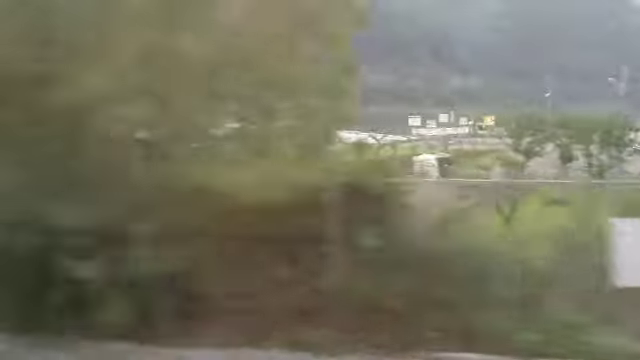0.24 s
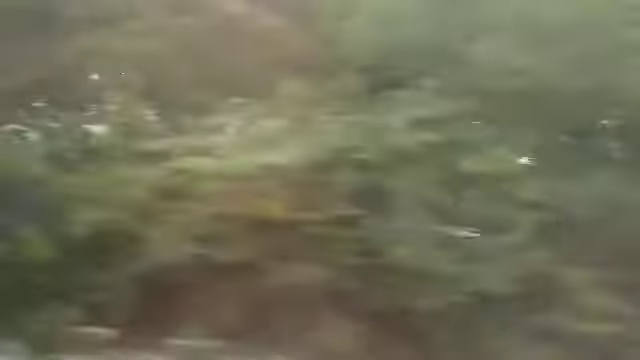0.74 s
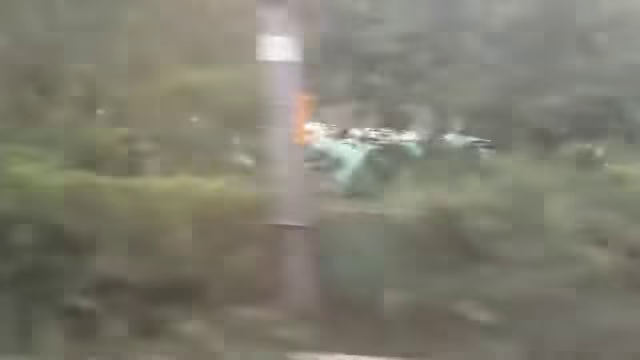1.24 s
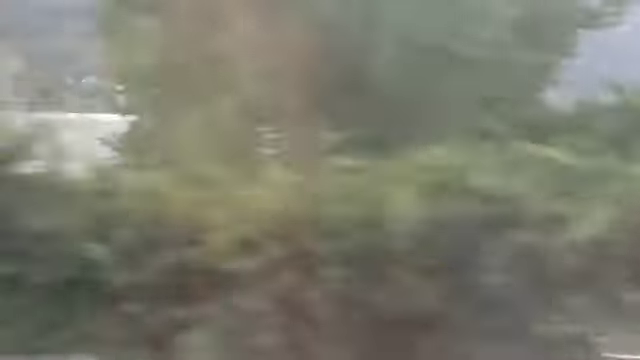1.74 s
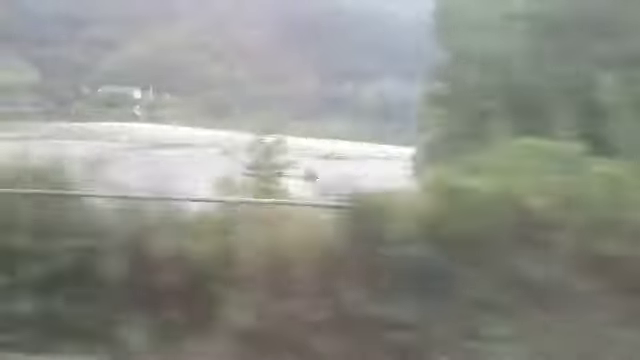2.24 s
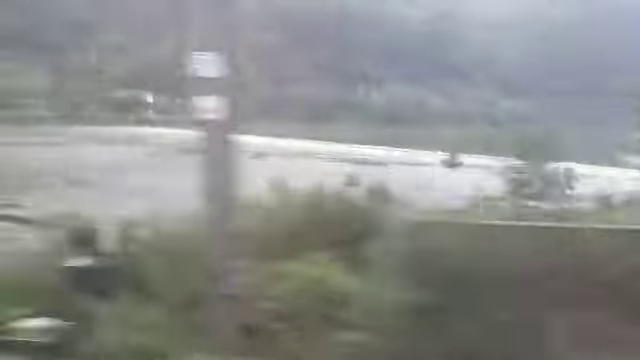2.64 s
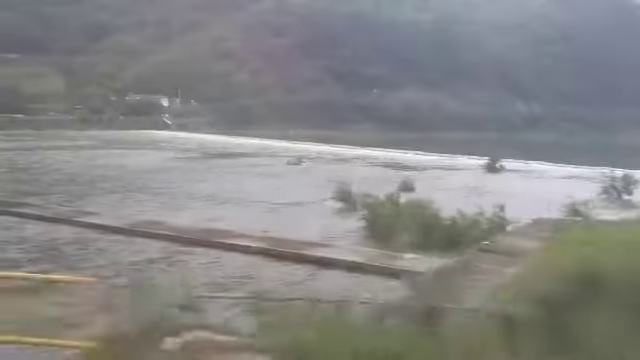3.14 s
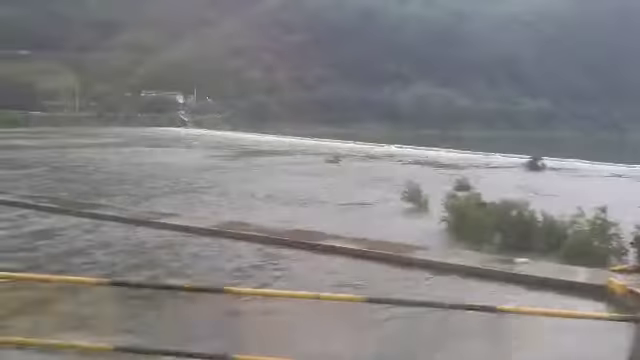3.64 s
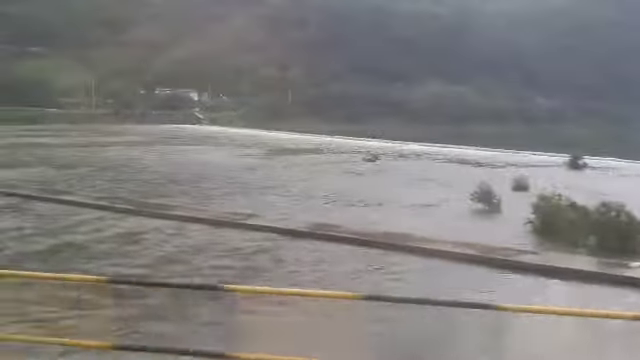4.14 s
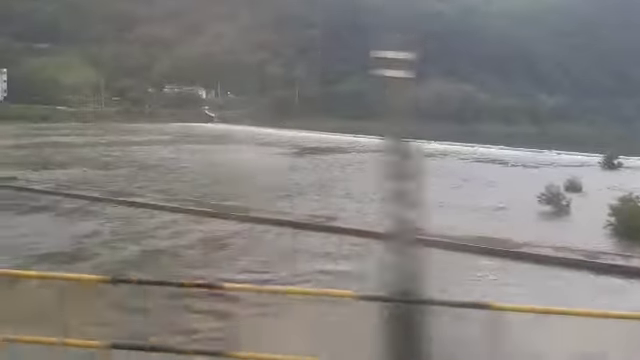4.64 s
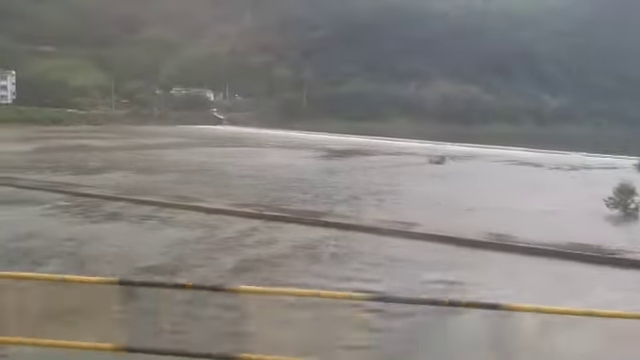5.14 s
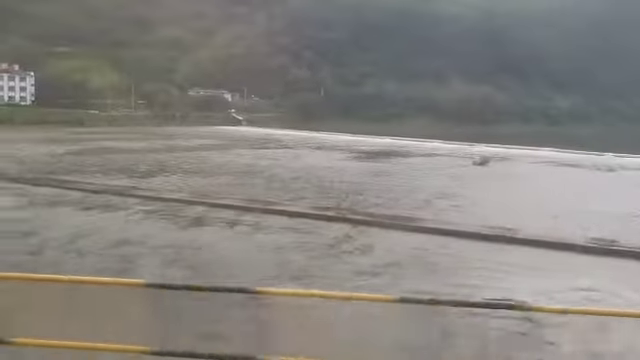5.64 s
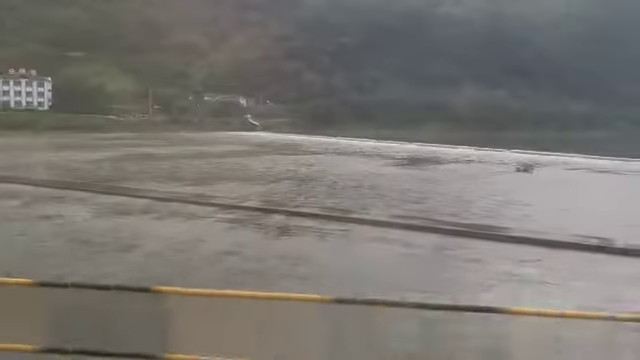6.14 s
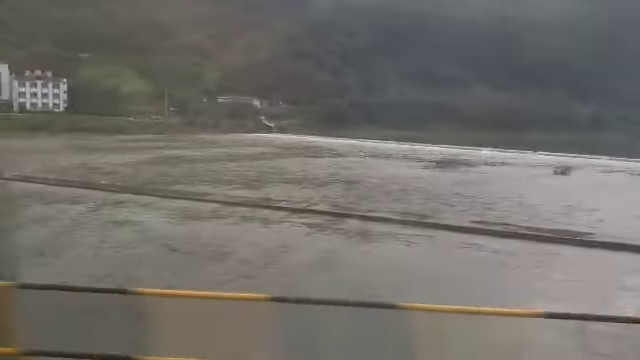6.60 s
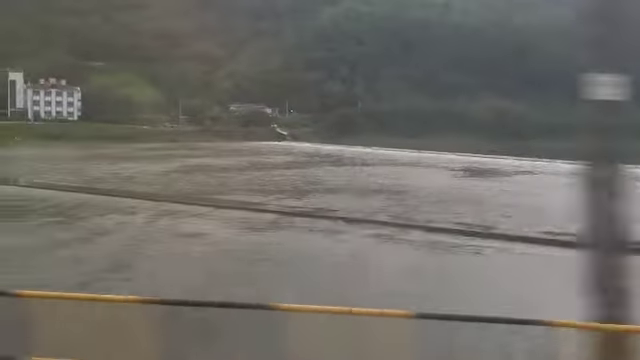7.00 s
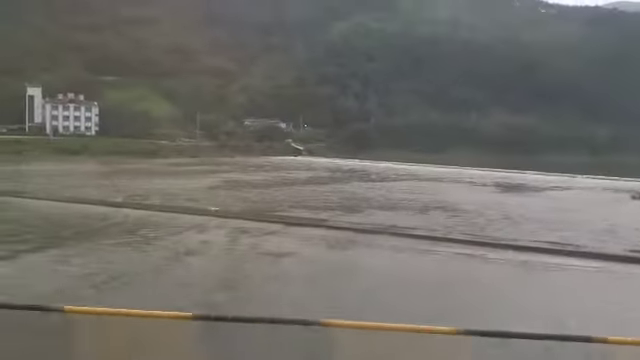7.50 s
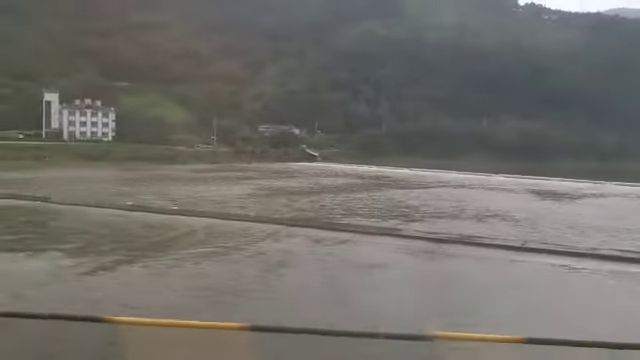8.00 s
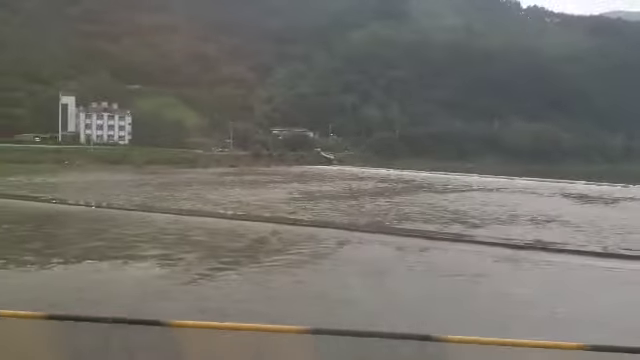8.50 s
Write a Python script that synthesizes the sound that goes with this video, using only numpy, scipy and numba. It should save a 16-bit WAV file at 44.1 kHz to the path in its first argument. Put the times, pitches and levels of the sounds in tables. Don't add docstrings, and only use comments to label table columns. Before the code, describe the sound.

Train interior by the window: deep rolling rumble, irregular booming jolts, a fading engine drone, faint gear whine and small crinkles of a bag.

```python
import sys
import numpy as np
from scipy import signal
from scipy.fft import rfft, irfft
from scipy.io import wavfile
from scipy.ndimage import uniform_filter1d
from numba import njit

SR = 44100
rng = np.random.default_rng(int(sys.argv[2]) if len(sys.argv) > 2 else 0)


def bounce(signal):
    frames = np.transpose(np.atleast_2d(signal))
    limited = np.clip(frames, -1, 1)
    pcm = np.round(limited * 32767).astype(np.int16)
    wavfile.write(sys.argv[1], SR, pcm)


def volts_from_decibels(level):
    exponent = np.asarray(level, float) / 20
    return 10 ** exponent


N = 386316

# freq_hz, density_db_per_hz
COACH_SPECTRUM = [(15, -35.5), (25, -23), (65, 3.5), (106, -8), (144, -7.5), (247, -11.5), (337, -11.5),
                  (436, -21), (549, -24.5), (896, -37), (2210, -44), (4090, -53.5), (7030, -67),
                  (10300, -70), (11800, -72), (15300, -107), (22000, -120)]
# freq_hz, width_hz, gain_db
SHELL_RESONANCES = [(61, 16, -1), (49.4, 9.5, 4.5), (90, 8, -0.5), (117, 14, 0.5), (139, 29, 2),
                    (100, 22, -1.5), (197, 13, -2.5), (142, 15, -2), (253, 21, 0), (167, 15, -5),
                    (269.5, 23, 2), (284, 3.7, -4), (351, 23, -2), (393.3, 10, -7), (396.6, 22, 4),
                    (456, 12, -5.5), (492, 30, -0.5), (545, 7.6, -1.5), (625, 12, 2.5), (703, 60, 2.5),
                    (1510, 73, -1.5), (1960, 87, 2.5), (2204, 50, 3.5), (2700, 720, 2), (7000, 1300, 8.5),
                    (8700, 1500, -1), (10300, 1200, 2.5)]
# time_s, level_db about its mean
RAIL_ROUGHNESS = [(0, 1), (.3, -3.5), (.55, -4.5), (1, -2), (1.4, 0), (2.1, -3), (2.75, 1), (3.2, 0.5),
                  (3.8, -1), (4.3, 0), (5.2, -3), (5.5, -0.5), (6.4, -2), (7.5, 0), (8, -2), (8.76, 0)]
# freq_hz, width_hz, level_db
GIRDER_RINGS = [
    (506, 78, -56.5),
    (601, 40, -58.5),
    (717, 70, -60.5),
]
# centre_s, peak_db, half_length_s
BENCH_SWELLS = [(1.04, -36, 0.062), (1.29, -32, 0.12), (1.59, -37, 0.11), (2.39, -35, 0.087),
                (2.639, -45, 0.084), (2.9, -36, 0.06), (4.51, -40, 0.092), (5.13, -35, 0.09),
                (5.348, -32.5, 0.17), (5.7, -33, 0.16), (6.108, -40, 0.04), (6.21, -35, 0.18),
                (6.86, -39, 0.09), (7.044, -29, 0.06), (7.23, -38, 0.083), (7.616, -29.0, 0.085),
                (8.01, -35, 0.091), (8.16, -40, 0.048), (8.357, -35.5, 0.072), (8.64, -32.5, 0.05)]
# centre_s, peak_db, half_length_s
WINDOW_SWELLS = [(0.12, -45, 0.1), (0.43, -52, 0.077), (0.78, -40.5, 0.12), (1.07, -37.5, 0.06),
                 (1.44, -39, 0.11), (1.71, -43.0, 0.07), (1.97, -39.5, 0.11), (2.11, -39, 0.05),
                 (2.57, -34.5, 0.059), (2.85, -35, 0.14), (3.46, -93.0, 0.1), (4.05, -40, 0.2),
                 (4.3, -43, 0.09), (4.54, -42.0, 0.13), (4.74, -48.5, 0.093), (4.99, -41, 0.099),
                 (5.39, -46, 0.15), (6.07, -38.5, 0.16), (6.39, -35.5, 0.057), (6.88, -40, 0.23),
                 (7.15, -38, 0.077), (7.4, -42.0, 0.04), (7.74, -41, 0.1), (8.4, -36.5, 0.11),
                 (8.69, -38, 0.06)]
# centre_s, peak_db, half_length_s
RACK_SWELLS = [(0.1, -53, 0.07), (1.58, -56, 0.17), (2.8, -50, 0.21), (3.9, -47, 0.058), (4.12, -56, 0.05),
               (4.29, -54.5, 0.1), (4.53, -48, 0.071), (4.78, -49, 0.14), (5.44, -47.5, 0.18),
               (5.55, -51, 0.037), (5.68, -48, 0.034), (5.85, -54, 0.05), (5.99, -52, 0.05),
               (6.13, -55, 0.04), (6.33, -50, 0.083), (6.56, -47.5, 0.06), (6.87, -45, 0.091),
               (7.12, -45, 0.065), (7.54, -45, 0.071), (7.97, -48.5, 0.11), (8.18, -44, 0.045),
               (8.41, -45.5, 0.14)]
# centre_s, peak_db, half_length_s
DUCT_SWELLS = [(4.43, -55.0, 0.07), (4.85, -55.0, 0.05), (5.22, -49.5, 0.1), (5.41, -57, 0.04),
               (5.55, -50.5, 0.17), (6.08, -54, 0.059), (6.31, -56.5, 0.068), (6.55, -53.0, 0.09),
               (6.74, -55.5, 0.04), (7.05, -49.5, 0.2), (7.21, -59, 0.06), (7.49, -52, 0.068),
               (7.66, -53, 0.06), (7.77, -55.5, 0.04), (8.51, -53.0, 0.09), (8.67, -54.5, 0.05)]
# centre_s, peak_db, half_length_s
WALL_SWELLS = [(.05, -37.5, 0.092), (.27, -38.5, 0.11), (.8, -37, 0.064), (1.2, -37, 0.054),
               (1.45, -48, 0.1), (1.87, -34.5, .08), (2.2, -40.5, 0.13), (2.55, -50, .1), (2.8, -38, 0.09),
               (2.97, -35.5, .07), (3.5, -41.5, 0.13), (3.9, -41, .2), (4.3, -36, 0.11),
               (4.85, -32.5, 0.053), (5.45, -38, 0.14), (5.77, -34, .08), (6.05, -36, 0.092),
               (6.22, -32, 0.13), (6.67, -34, .08), (6.97, -32.5, 0.084), (7.25, -37, .12),
               (7.57, -30, 0.1), (7.87, -34, 0.12), (8.15, -36.5, 0.096), (8.3, -37, 0.14),
               (8.65, -36.5, 0.08)]
# centre_s, peak_db, half_length_s
FLOOR_SWELLS = [(0.25, -48, 0.4), (0.94, -29.5, 0.14), (1.3, -43, 0.29), (2.09, -38, 0.3),
                (2.4, -25.5, 0.039), (2.78, -38, 0.039), (3.3, -39, 0.11), (3.6, -33, 0.082),
                (3.74, -34.5, 0.053), (3.93, -31.5, 0.058), (4.26, -30, 0.3), (4.85, -35.5, 0.072),
                (5.04, -29.5, 0.068), (5.25, -44, .08), (5.57, -33, 0.28), (5.88, -29, 0.073),
                (6.06, -25.5, 0.071), (6.62, -32.5, 0.095), (6.86, -27.5, 0.059), (7.09, -27, 0.12),
                (7.48, -24.5, 0.053), (7.87, -25.5, 0.077), (8.13, -30, 0.072), (8.29, -32.5, 0.054),
                (8.43, -29, 0.08), (8.65, -33, 0.11)]
# centre_s, peak_db, half_length_s
WHINE_SWELLS = [(.3, -67, .2), (.65, -62.5, .25), (.92, -64, .1), (1.25, -66, .15), (1.62, -60, .16),
                (1.9, -65, .15), (2.2, -60, .18), (2.45, -57, .12), (2.63, -55.5, .14), (2.9, -62, .15),
                (3.82, -62, .17), (4.2, -68, .15), (4.47, -61, .08), (4.95, -61, .18), (5.3, -61, .22),
                (5.75, -67, .25), (6.5, -72, .4)]
# centre_s, peak_db, half_length_s
STAGE_SWELLS = [(.15, -62, .15), (.8, -58, .3), (1.3, -72, .2), (2.1, -65, 0.4), (2.7, -61, 0.36),
                (3.4, -67, .45), (4.5, -73, .5), (7, -71, .4), (8.7, -73, .6)]
# centre_s, peak_db, half_length_s
BEAT_SWELLS = [(.6, -66, .35), (2.95, -66, .15), (3.5, -71, .3), (5.15, -67, .25), (5.9, -66, .3),
               (6.5, -68, .08), (6.9, -63, .13), (8.3, -66, .2), (8.7, -62, .2)]
# centre_s, peak_db, half_length_s, pitch_hz
FAN_SWELLS = [
    (2.4, -70.5, 1.2, 1430),
]
# centre_s, peak_db, half_length_s, pitch_hz
SQUEAK_SWELLS = [
    (2.955, -56, .02, 1285),
    (2.985, -53, .025, 1305),
]
# centre_s, peak_db, half_length_s, crisp_db re peak
RUSTLE_SWELLS = [(0.01, -58, 0.059, -11), (0.15, -64.5, 0.26, -11), (0.48, -68, 0.037, -6),
                 (0.58, -61, 0.04, -7.5), (0.768, -56.5, 0.014, -2), (0.79, -61, 0.023, -2),
                 (0.83, -65, 0.04, -6), (1.12, -67.8, 0.13, -8), (1.52, -65, 0.27, -14),
                 (2.18, -65.6, 0.56, -8), (2.6, -63, .02, -4), (2.65, -58.5, 0.046, -9.5),
                 (2.7, -63, 0.026, -5), (2.755, -62.5, 0.034, -7), (3.0, -61, 0.06, -11),
                 (3.52, -64, 0.06, -9.5), (3.71, -66.5, 0.072, -7.5), (3.9, -60.5, 0.089, -10),
                 (4.26, -65, 0.097, -8), (4.364, -58, 0.009, 0), (4.385, -65, .02, -7),
                 (4.46, -62.5, 0.12, -3), (4.62, -58.5, 0.074, -9), (4.68, -61.5, .04, -8),
                 (4.74, -61, .05, -8), (4.97, -61, 0.035, -9.5), (5.03, -56.5, 0.0301, -17),
                 (5.07, -59, 0.0398, -11), (5.11, -63, .04, -8), (5.17, -66, .06, -7),
                 (5.34, -67, 0.27, -12), (5.5, -61, 0.02, -3), (5.74, -72, 0.046, -17),
                 (6.28, -67, 0.054, -8.5), (6.89, -65, 0.023, -12), (7.16, -70, 0.21, -12),
                 (7.67, -74, 0.219, -8), (8.04, -70, 0.083, -13), (8.26, -61, 0.011, -10),
                 (8.56, -67.5, 0.16, -4.5)]
# centre_s, peak_db, half_length_s, pitch_hz
FOLD_SWELLS = [(.03, -63, .04, 3500), (3.01, -65, .035, 5780), (3.08, -70, .012, 5750),
               (4.37, -65, .03, 5300), (4.43, -65, .04, 5500), (4.49, -63, .035, 5350),
               (4.63, -66, .04, 4500), (5.03, -64, .008, 4200), (5.045, -65, .02, 5700),
               (7.52, -70, .05, 2700), (7.64, -65, .05, 2750)]
# start_s, peak_db, centre_hz, body_db re tick
BAG_TICKS = [(.166, -48, 7550, -17), (.556, -50, 7990, -7), (0.756, -44, 9520, -15),
             (1.5005, -47, 8140, -20), (1.534, -47, 7600, -20), (1.568, -43, 7500, -20),
             (1.6, -45, 7000, -23), (2.627, -52, 7900, -20), (2.66, -52, 6500, -20),
             (2.68, -53, 10000, -20), (3.043, -53, 7900, -18), (3.7025, -50, 6720, -15),
             (4.357, -46, 9540, -20), (4.3844, -51, 7405, -20), (4.62, -51, 5100, -15),
             (4.715, -52, 9480, -22), (5.035, -49, 4810, -10), (5.05, -50, 5790, -12),
             (5.4819, -49, 7000, -10), (5.7249, -51, 6800, -15), (6.248, -45.5, 7630, -12),
             (7.6695, -52, 7000, -15), (8.2348, -41.5, 9370, -15), (8.26, -38, 10170, 2),
             (8.2697, -52, 5006, 17), (8.3255, -47, 8380, -22), (8.5907, -44, 6690, -8)]
# time_s, cycle_rate_hz, load_0_to_1
ENGINE_RUN = [
    (0, 16.8, 1),
    (2.35, 16.8, 1),
    (2.85, 17.03, .95),
    (3.0, 17.08, .7),
    (3.12, 17.12, .1),
    (3.4, 17.175, 0),
    (4.3, 17.205, 0),
    (8.76, 17.215, 0),
]
# multiple_of_cycle, loaded_db, coasting_db
ENGINE_ORDERS = [(5, -42.5, -50.5), (6, -51, -50), (7, -46, -54.5), (8, -38.5, -41), (9, -29, -41),
                 (10, -44, -50), (11, -43.5, -45), (12.45, -33, -41), (13, -44.5, -46), (14, -73, -53.5),
                 (15, -54.5, -60), (16, -47.5, -70), (17, -44.5, -44.5), (18, -55.5, -45.5), (19, -53, -49),
                 (20, -43, -45.5), (21, -47.5, -53.5), (22, -47, -50), (23, -63.5, -63), (24, -57.5, -53),
                 (25, -69, -61), (26, -70, -63), (27, -81, -66.5), (28, -63, -73), (29, -73.5, -63),
                 (30, -76.5, -76.5)]
# time_s, level_db at order 12
ENGINE_PULL = [
    (0, -3),
    (.45, 1.5),
    (.95, -3),
    (1.4, 1.5),
    (1.85, 2.5),
    (2.15, -1),
    (2.55, 3.5),
    (2.9, -1),
    (3.2, -1),
    (8.76, 2),
]
# centre_s, peak_db, half_length_s, pitch_hz
FLOOR_BOOMS = [(0.03, -21.5, 0.087, 64.2), (0.17, -19.5, 0.071, 63.3), (0.32, -23, 0.04, 60.8),
               (0.58, -23, 0.15, 63), (0.83, -23, 0.053, 64.5), (1.22, -25, 0.031, 63.9),
               (1.09, -19, 0.057, 63), (1.36, -17.5, 0.097, 63.3), (1.59, -26, 0.059, 61.57),
               (1.76, -19.5, 0.088, 63.4), (1.95, -23.5, 0.069, 60.6), (2.08, -25, 0.048, 61.2),
               (2.25, -26.0, 0.053, 66), (2.44, -16, 0.055, 61.6), (2.57, -20.5, 0.061, 61.0),
               (2.69, -27, 0.038, 62.9), (2.822, -11.5, 0.018, 62.3), (2.87, -18, 0.029, 61.4),
               (2.985, -12, 0.031, 61.0), (3.06, -14.5, 0.053, 61.3), (3.33, -22.5, 0.074, 65.4),
               (3.55, -21.5, 0.056, 63.15), (3.82, -29, 0.039, 60.5), (3.91, -17.5, 0.069, 62),
               (3.7, -34, 0.047, 61), (4.13, -26, 0.095, 61.1),
               (4.432, -18.5, 0.13, 62.64), (4.725, -29, 0.059, 57.5), (4.983, -22, 0.041, 57.63),
                (5.181, -23, 0.029, 60.8), (5.301, -30, 0.027, 63.8), (5.487, -15.5, 0.11, 63.7),
                (5.767, -19, 0.017, 62.1), (5.878, -18.5, 0.074, 62.67), (6.128, -18.5, 0.1, 62.3),
                (6.31, -23, 0.04, 64.7), (6.428, -25, 0.031, 61.7), (6.55, -13.5, 0.061, 60.9),
                (6.829, -22.5, 0.11, 61.53), (6.989, -34, 0.16, 59.7), (7.149, -13.5, 0.048, 59.8),
                (7.339, -20, 0.11, 62.2), (7.568, -24, 0.052, 62.3), (7.73, -20, 0.045, 61),
                (7.8, -21.5, 0.077, 60.5), (7.907, -18, 0.032, 61.6), (8.034, -18, 0.043, 59.5),
                (8.15, -19.5, 0.061, 59.7), (8.377, -29, 0.12, 60.42), (8.538, -19, 0.053, 61.3),
                (8.712, -14.5, 0.087, 58.74)]


def unit(x):
    return x / np.sqrt(np.mean(x ** 2))


def curves(table):
    time_s, *columns = np.transpose(table)
    return [np.interp(np.arange(N) / SR, time_s, column) for column in columns]


def walk(rate_hz):
    hold = int(SR / rate_hz)
    steps = np.repeat(rng.standard_normal(N // hold + 1), hold)
    return unit(uniform_filter1d(uniform_filter1d(steps, hold), hold)[:N])


def swells(table, rest_db, onset=1.0):
    coarse_s = np.arange(0, N + 64, 64) / SR
    centre_s, peak_db, half_s, *more = np.transpose(table)
    late = (coarse_s - centre_s[:, None]) / half_s[:, None]
    bells = np.exp(-2 * (late / np.where(late < 0, onset, 2 - onset)) ** 2)
    power = volts_from_decibels(rest_db) ** 2 + volts_from_decibels(peak_db) ** 2 @ bells
    now_s = np.arange(N) / SR
    level_db = np.interp(now_s, coarse_s, 10 * np.log10(power))
    return [level_db] + [np.interp(now_s, centre_s, column) for column in more]


@njit
def svf(x, hz, width):
    y, band, low = np.empty(len(x)), 0., 0.
    for i in range(len(x)):
        g, k = np.tan(np.pi * hz[i] / SR), width / hz[i]
        v = (band + g * (x[i] - low)) / (1 + g * (g + k))
        band, low, y[i] = 2 * v - band, low + 2 * g * v, k * v
    return y


def steep(x, hz, width_hz):
    hz = np.full(len(x), 1. * hz)
    return svf(svf(x, hz, width_hz), hz, width_hz)


def tone(hz, db, wander_hz, wander_rate_hz, flutter_db, overtone_db=-80):
    phase = 2 * np.pi * (rng.random() + np.cumsum(hz + wander_hz * walk(wander_rate_hz)) / SR)
    wave = np.sin(phase) + volts_from_decibels(overtone_db) * np.sin(2 * phase)
    return np.sqrt(2) * volts_from_decibels(db + flutter_db * walk(wander_rate_hz)) * wave


def on_bridge():
    return np.interp(np.arange(N) / SR, [3.24, 4.93], [0, 1])


def rolling():
    bridge = on_bridge() - .5
    rail_db, = curves(RAIL_ROUGHNESS)
    load = curves(ENGINE_RUN)[1] - .5
    rumble_db = 0.82 * rail_db + 4.5 * bridge + 2 * load
    deck_db = 0.48 * rail_db + 5.5 * bridge + 1.45 * load
    air_db = 0.43 * rail_db + 5 * bridge + 3 * load

    f = np.maximum(np.fft.rfftfreq(N, 1 / SR), 1)
    hz, db = np.transpose(COACH_SPECTRUM)
    shell = volts_from_decibels(np.interp(np.log(f), np.log(hz), db))
    for centre_hz, width_hz, gain_db in SHELL_RESONANCES:
        shell = shell * volts_from_decibels(gain_db / (1 + (2 * (f - centre_hz) / width_hz) ** 2))
    noise = rfft(rng.standard_normal(N)) * shell
    scale = np.sqrt(2 * np.sum(np.abs(noise[(f > 90) & (f < 380)]) ** 2)) / N

    out = 0
    for octave in np.arange(0, 10, .5):
        place = np.log2(f / 16) - octave
        band = irfft(noise * np.cos(np.pi * np.clip(place, -.5, .5)) ** 2, N)
        centre = np.log(16 * 2 ** octave)
        rumble = np.interp(centre, np.log([300, 480]), [1, 0])
        deck = np.interp(centre, np.log([312, 490, 800, 1190]), [0, 1, 1, 0])
        air = np.interp(centre, np.log([800, 1200, 4000, 8000]), [0.034, 0.7, 0.84, .4])
        level_db = rumble * rumble_db + deck * deck_db + air * air_db
        out = out + band * volts_from_decibels(level_db + 0.52 * walk(8.2))
    return out / scale * volts_from_decibels(-30.5)


def girders():
    out = 0
    for hz, width_hz, level_db in GIRDER_RINGS:
        ring = unit(steep(rng.standard_normal(N), hz, 1. * width_hz))
        out = out + volts_from_decibels(level_db + 3.0 * walk(4.8)) * ring
    return on_bridge() * out


def fittings():
    parts = [  # swells, ring_hz, wander_hz, rest_db
        (BENCH_SWELLS, 118, 3, -52),
        (WINDOW_SWELLS, 342, 7.94, -48.5),
        (RACK_SWELLS, 494, 8, -65),
        (DUCT_SWELLS, 710, 11.05, -69),
    ]
    out = 0
    for table, ring_hz, wander_hz, rest_db in parts:
        out = out + tone(np.full(N, 1. * ring_hz), *swells(table, rest_db), wander_hz, 20, 1.1)
    return out


def wall_panel():
    return tone(np.full(N, 275.), *swells(WALL_SWELLS, -53.5), 6, 24, 2.)


def floor_panel():
    return tone(np.full(N, 141.), *swells(FLOOR_SWELLS, -45), 3.64, 16, .8)


def machinery():
    t = np.arange(N) / SR
    whine = tone(1017.5 + 22 * t, *swells(WHINE_SWELLS, -71), 1.1, 16, 2.5)
    stage = tone(765 + 16 * t, *swells(STAGE_SWELLS, -80.5), 1., 7.7, 1.5)
    beat_hz = 1103 - 15 * np.maximum(t - 3.9, 0)
    beat = tone(beat_hz, *swells(BEAT_SWELLS, -77.5), 1.2, 6.7, 1.5)
    fan_db, fan_hz = swells(FAN_SWELLS, -78.0)
    fan = tone(fan_hz, fan_db, 1.4, 8.7, 2.2)
    squeak_db, squeak_hz = swells(SQUEAK_SWELLS, -120)
    squeak = tone(squeak_hz, squeak_db, 2.7, 60.15, 2.1, overtone_db=-16)
    return whine + stage + beat + fan + squeak


def bag():
    rustle_db, crisp_db = swells(RUSTLE_SWELLS, -68.5, onset=0.95)
    grain_db = 3.4 * np.minimum(rng.exponential(size=N), 5) + .9 * walk(90)
    crinkle = rng.standard_normal((2, N)) * volts_from_decibels(grain_db)
    sheet = unit(steep(crinkle[0], 5370, 6200.0))
    sheet = sheet + volts_from_decibels(crisp_db) * unit(steep(crinkle[1], 9600, 5100.0))
    fold_db, fold_hz = swells(FOLD_SWELLS, -92.0)
    fold = unit(steep(rng.standard_normal(N), fold_hz, 450.))
    out = volts_from_decibels(rustle_db - .6) * sheet + volts_from_decibels(fold_db) * fold

    t = np.arange(2048) / SR
    for start_s, peak_db, tick_hz, body_db in BAG_TICKS:
        decay = np.exp(-t / .0008) + volts_from_decibels(-20) * np.exp(-t / .01)
        snap = rng.standard_normal(2048) * decay
        bright = svf(snap, np.full(2048, 1. * tick_hz), 7500.)
        body = steep(snap, 2200, 1800.)
        tick = bright / np.abs(bright).max() + volts_from_decibels(body_db - 2) * body / np.abs(body).max()
        i = int(start_s * SR)
        out[i:i + 2048] += volts_from_decibels(peak_db) * tick[:N - i]
    return out


def engine():
    cycle_hz, load = curves(ENGINE_RUN)
    pull_db, = curves(ENGINE_PULL)
    phase = 2 * np.pi * np.cumsum(cycle_hz + 0.0076 * walk(3.0)) / SR
    out = 0
    for order, loaded_db, coasting_db in ENGINE_ORDERS:
        level_db = load * loaded_db + (1 - load) * coasting_db
        surge_db = pull_db * min(order / 12, 1) ** 3
        flutter_db = (.45 + 1.45 * (1 - load)) * walk(4)
        start = 2 * np.pi * rng.random()
        out = out + volts_from_decibels(level_db + surge_db + flutter_db) * np.sin(round(order) * phase + start)
    return np.sqrt(2) * volts_from_decibels(-0.46) * out


def floor_boom():
    boom_db, boom_hz = swells(FLOOR_BOOMS, -41.5)
    return tone(boom_hz, boom_db, 2.2, 14, .6)


def scene():
    structure = rolling() + girders() + fittings() + wall_panel() + floor_panel()
    mix = structure + machinery() + bag() + engine() + floor_boom()
    return mix[None]


def roll_off(x):
    return signal.sosfilt(signal.butter(12, 12350, fs=SR, output="sos"), x)


def record(dry):
    top = signal.butter(16, 11200, fs=SR, output="sos")
    settled = signal.sosfilt_zi(top) * dry[0, 0]
    running, _ = signal.sosfilt(top, dry[0], zi=settled)
    return roll_off(running[None])


dry = scene()
out = record(dry)
bounce(out)
```